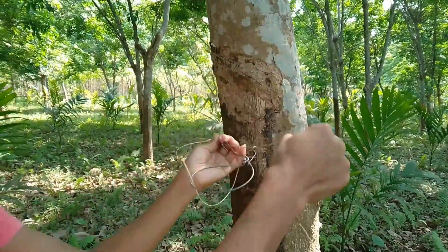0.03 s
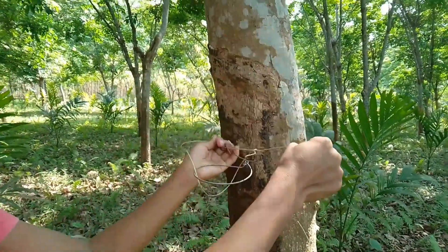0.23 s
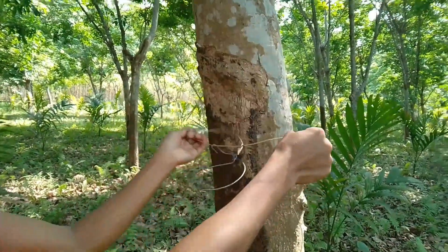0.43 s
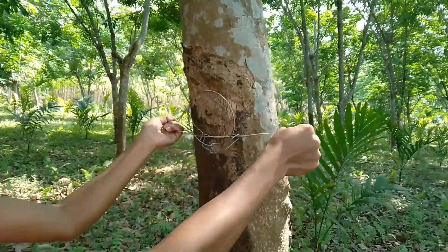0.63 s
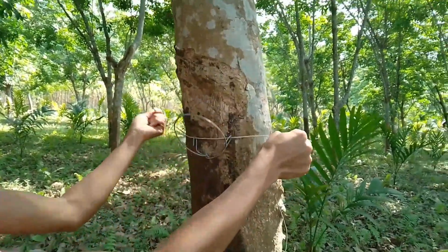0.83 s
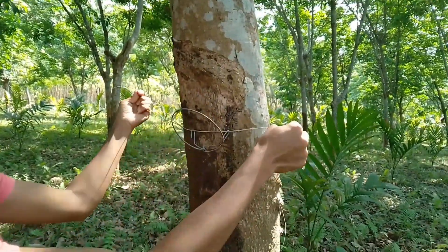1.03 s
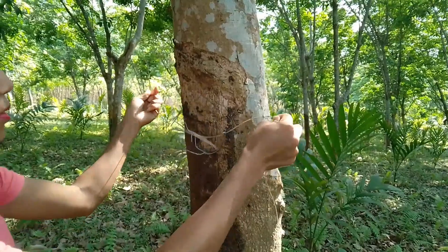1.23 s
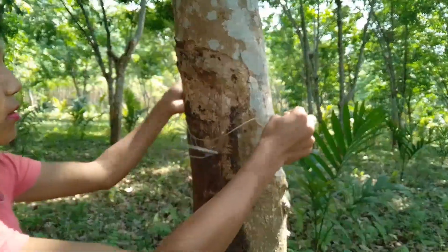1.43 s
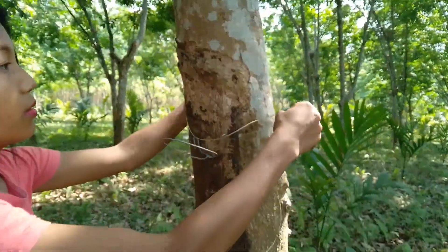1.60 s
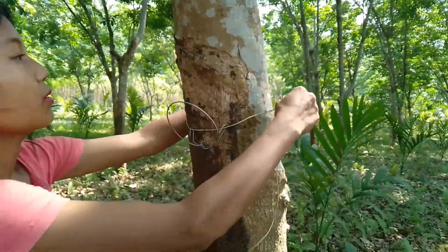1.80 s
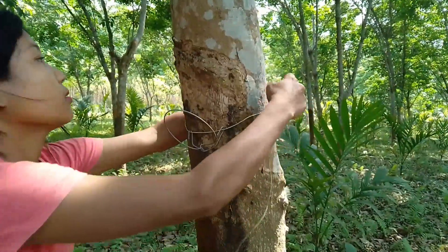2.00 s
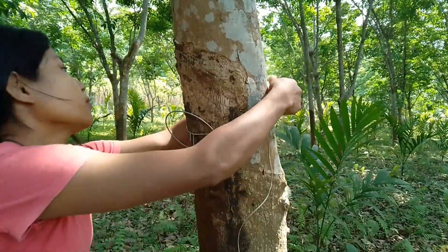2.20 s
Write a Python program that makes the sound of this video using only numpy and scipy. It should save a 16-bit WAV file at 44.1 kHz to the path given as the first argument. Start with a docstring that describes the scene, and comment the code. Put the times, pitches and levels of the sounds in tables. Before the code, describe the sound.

Close by, a thin cord scrapes across tree bark with a high rasp and dry ticks. It slows, gives a brief tug, then rubs softly as it is adjusted. The outdoor background holds only a faint, high hiss.

```python
"""One long, rasping pull as a thin, stiff strand is drawn round a tree trunk outdoors.
A short tug follows, then light rubbing as the strand is adjusted. The rasp is thousands of tiny slips
over the bark, which also set the strand ringing. Bigger snags let go as dry ticks, and quick sticking
and slipping makes brief squeaks. Ground and leaves add a short echo; a faint high hiss lies behind."""
import sys
import numpy as np
from scipy import signal
from scipy.fft import rfft, irfft, next_fast_len
from scipy.io import wavfile
from scipy.ndimage import uniform_filter1d

SR = 44100
rng = np.random.default_rng(int(sys.argv[2]) if len(sys.argv) > 2 else 0)


def digitize_waveform(pressure):
    """Quantize a signal to 16-bit integers and store it at the path in sys.argv[1].

    Rows of a 2-D input are taken as channels; values are limited to [-1, 1].
    """
    field = np.atleast_2d(pressure).T
    bounded = np.clip(field, -1, 1)
    quanta = np.round(bounded * 32767).astype(np.int16)
    wavfile.write(sys.argv[1], SR, quanta)


N = 103635
T = np.arange(N) / SR
RELEASE_S = 0.025   # fade at the end of the pull and of the tug

# How hard the strand rubs in the pull and in the tug: time_s, level_db
PULL_LEVELS = [(0, -66.5), (.125, -65.5), (.2, -54.5), (.25, -43), (.3, -37.5), (.39, -33.5), (.44, -35.5),
               (.5, -36.5), (.56, -36.5), (.65, -41.5), (.69, -45), (.76, -50.5), (.845, -53.5)]
TUG_LEVELS = [(.851, -57), (.864, -43), (.875, -44), (.893, -51.5), (.915, -52), (.965, -53.5), (1.03, -63),
              (1.15, -78.5), (1.25, -67.5)]
# The pitches at which the free strand rings: pitch_hz, width_hz, level_db
STRAND_RINGS = [(2186, 160, -11), (2850, 67, -9), (4160, 410, -20.5), (4980, 83, -9), (6770, 220, -20),
                (9600, 87, -19.5), (10640, 280, -19), (12000, 130, -9.5), (12300, 120, -3.5),
                (13900, 300, -8.5)]


def long_pull():
    """The strand rasps round the trunk, taut at first, then crackling and ringing as it slows."""
    # How fast the strand moves: time_s, share_of_full_speed
    pull_speed = [(.5, 1), (.72, .2)]
    # Tone of the taut strand rubbing: pitch_hz, level_db
    taut_tone = [(300, -42.5), (1000, -25), (1600, -12.5), (2100, -2), (2550, -2), (3400, -7), (6300, -6),
                 (7700, -14), (9000, -10.5), (10500, -5.5), (11700, 2), (12600, 2.5), (13400, -5.5),
                 (14400, -20.5), (15600, -9.5)]
    # Treble compared with the rest of the rasp: time_s, level_db
    brightness = [(.15, 1.5), (.24, -2), (.34, -2.5), (.45, 1.5), (.58, -2.5), (.68, -0.5), (.8, -2)]
    speed = np.interp(T, *np.transpose(pull_speed))
    slips_per_s, catch_db = 9000 * speed, 0.5
    run = slips(slips_per_s, catch_db + 3 * (1 - speed))   # a slower strand catches more
    run = run + from_db(-5) * pings()
    rasp = rms_one(coloured(run, taut_tone))
    # One high band stays weak early on, so the pull starts hollow.
    band = signal.sosfiltfilt(signal.butter(2, [7000, 8900], "band", fs=SR, output="sos"), rasp)
    rasp = rasp - 0.6 * np.clip((0.373 - T) / 0.042, 0, 1) * band
    # As the strand slackens, up to half the power goes into ringing.
    ring_share = np.clip((T - 0.69) / 0.18, 0, 1) / 2
    ring = rms_one(ringing(run, STRAND_RINGS))
    rasp = np.sqrt(1 - ring_share) * rasp + np.sqrt(ring_share) * ring
    treble = signal.sosfiltfilt(signal.butter(2, 4700, "high", fs=SR, output="sos"), rasp)
    tilt = np.sqrt(level(brightness))
    ridges = rms_one(from_db(1.2 * drift(rate_hz=150)))   # bark ridges roughen the middle pitches
    rasp = treble * tilt + ridges * (rasp - treble) / tilt
    fade_out = np.clip((TUG_LEVELS[0][0] - T) / RELEASE_S, 0, 1)
    return fade_out * (level(PULL_LEVELS) + scuffs()) * rasp + bark_rasp(slips_per_s, catch_db)


def bark_rasp(slips_per_s, catch_db):
    """The bark answers with a lower rasp as the strand presses into it."""
    # Loudness of the low rasp: time_s, level_db
    bark_levels = [(0, -95), (.18, -75), (.3, -60), (.42, -50), (.57, -55.5), (.68, -64.5), (.8, -71.5),
                   (.87, -78), (.96, -70.5), (1.05, -104)]
    # Tone of the bark: pitch_hz, level_db
    bark_tone = [(150, -32.5), (270, -15), (440, -4), (590, -7), (780, 2), (920, -8.5), (1200, 5),
                 (1700, 6.5), (2600, -8.5), (5000, -23.5)]
    return level(bark_levels) * rms_one(coloured(slips(slips_per_s, catch_db), bark_tone))


def light_rubbing():
    """Fewer slips on a slack strand: a tug that sets it ringing, then small adjustments."""
    # Tone of the slack strand rubbing: pitch_hz, level_db
    slack_tone = [(300, -27), (1400, -12.5), (2100, -2), (2950, -3), (3700, -7), (5300, -6), (7000, -12.5),
                  (8600, -12), (10300, -7), (11500, -8), (12500, -1), (13500, -0.5), (14400, -21.5),
                  (15600, -24.5)]
    # How hard the strand rubs while it is adjusted: time_s, level_db
    adjust_levels = [(1.66, -72.5), (1.7, -66.5), (1.865, -75.5), (1.882, -59.5), (1.912, -62.5),
                     (1.96, -65.5), (2.1, -62.5), (2.13, -57.5), (2.18, -63.5), (2.21, -53), (2.255, -57.5),
                     (2.35, -52.5)]
    # The pitches at which the shortened strand rings: pitch_hz, width_hz, level_db
    short_rings = [(2950, 220, -17.5), (10870, 120, -6), (11980, 190, -4.5), (12800, 170, -10),
                   (12900, 200, -15.5)]
    run = slips(per_s=4500, catch_db=6.5) + from_db(-3) * pings()
    rub = rms_one(coloured(run, slack_tone))
    surges = scuffs()
    fade_in = np.clip((T - PULL_LEVELS[-1][0]) / 0.006 + 1, 0, 1)
    fade_out = np.clip((TUG_LEVELS[-1][0] - T) / RELEASE_S, 0, 1)
    tug_gain = fade_in * fade_out * (level(TUG_LEVELS) + surges)
    tug = from_db(-2) * rub + ringing(rub, STRAND_RINGS)
    adjust_gain = (T > adjust_levels[0][0]) * (level(adjust_levels) + surges)
    adjusting = from_db(-2.5) * rub + ringing(rub, short_rings)
    return tug_gain * tug + adjust_gain * adjusting


def slips(per_s, catch_db, spread_db=3.5, even_s=0.023):
    """Tiny slips of random size, bunched as the strand catches and comes free."""
    sizes = from_db(spread_db * np.minimum(rng.exponential(1, N), 4)) * rng.choice([-1, 1], N)
    slipping = rng.random(N) < per_s / SR
    grip = from_db(catch_db * drift(rate_hz=48))
    run = rms_one(sizes * slipping * grip)
    # Even out chance swings in loudness so the rasp stays steady.
    return run / np.sqrt(uniform_filter1d(run ** 2, int(even_s * SR)) + 1e-6)


def pings(count=48, per_s=1600, spread_db=2.2, low_hz=1678, high_hz=13987):
    """Some slips pluck the strand, which pings at a pitch set by where it caught."""
    sizes = from_db(spread_db * np.minimum(rng.exponential(1, N), 3)) * rng.choice([-1, 1], N)
    plucks = sizes * (rng.random(N) < per_s / SR)
    spot = rng.integers(0, count, N)
    pitches = low_hz + (high_hz - low_hz) * (np.arange(count) + rng.random(count)) / count
    return rms_one(sum(resonance(plucks * (spot == k), hz, width_hz=100) for k, hz in enumerate(pitches)))


def ringing(run, rings):
    """The slips set the strand ringing at its own pitches."""
    return sum(from_db(db) * resonance(run, hz, width_hz) * (-1) ** k
               for k, (hz, width_hz, db) in enumerate(rings))


def scuffs(rise_s=0.0008):
    """Extra gain for the rubbing: brief, soft surges as the strand drags over rough spots."""
    # One surge per row: start_s, decay_s, level_db
    rough_spots = [(0.141, 0.0028, -47), (0.173, .008, -46), (.214, 0.0033, -45), (0.611, 0.0057, -44),
                   (0.746, 0.0014, -51), (0.855, 0.0045, -54), (0.974, 0.0043, -53), (1.075, 0.0044, -53.5),
                   (1.885, 0.0032, -54), (1.904, 0.0033, -65), (2.19, 0.0032, -48)]
    gain = 0
    for start_s, decay_s, db in rough_spots:
        age = np.maximum(T - start_s, 0)
        gain = gain + from_db(db) * (1 - np.exp(-age / rise_s)) * np.exp(-age / decay_s)
    return gain


def ticks(size=1024, rise_s=0.00012, hold_s=0.001, fall_s=0.00055, tail_s=0.003):
    """Each snag lets go in a tiny burst: a mix of woody knock, crack and bright snap."""
    # One snag per row: start_s, knock_db, crack_db, snap_db, knock_pitch_hz
    snags = [(0.0613, -71, -66, -46, 2920), (0.0786, -51.5, -57, -55, 2140),
             (0.3703, -32.5, -49, -28, 2700), (0.396, -45, -40, -31, 3100), (0.455, -45, -49, -30, 3230),
             (0.4574, -32, -34, -23, 3370), (0.5494, -31.5, -35, -29, 2260), (0.586, -41, -55, -31, 2620),
             (0.601, -37.5, -51, -34, 2350), (0.6243, -34, -50, -32, 2600), (0.642, -38.5, -51, -29, 2600),
             (0.6467, -32, -50, -27.5, 3070), (.653, -32, -35.5, -30.5, 2520), (0.695, -38, -47, -40, 2380),
             (.712, -41.5, -37.5, -27, 2800), (0.7318, -40, -50, -50, 2480), (0.7642, -44, -56, -43, 2670),
             (.8248, -49, -48, -37.5, 2800), (0.9239, -43.5, -40.5, -43, 3000),
             (0.9327, -54, -59, -35, 2660), (.945, -42, -47, -34.5, 3200), (.9545, -47, -61, -65, 2110),
             (1.077, -75, -52.5, -42, 2300), (1.1444, -62, -56, -49, 3070), (1.306, -63, -71, -49.5, 2290),
             (1.423, -59.5, -67, -52.5, 2680), (1.454, -48.5, -70, -33, 2520),
             (1.7293, -39.5, -50, -45, 3040), (1.855, -60, -62, -48, 2190), (1.8755, -62, -53, -53, 3030),
             (2.011, -47, -74, -55, 2850), (2.1118, -49.5, -60, -46, 3250), (2.2143, -45.5, -53, -59, 3400),
             (2.2728, -43, -43, -39.5, 3430), (2.3377, -44.5, -65, -52, 2950)]
    # Tones of the three parts: pitch_hz, level_db
    knock_tone = [(200, -45), (800, -23.5), (1150, -17), (1800, -15), (2600, -1), (3150, -1), (4000, -8),
                  (9000, -34)]
    crack_tone = [(1500, -59), (3800, -7.5), (5400, 5), (7000, 5.5), (8500, -26), (13000, -52)]
    snap_tone = [(4000, -39), (7500, -18), (9200, -4), (10200, -3.5), (11400, 8), (13400, 3.5),
                 (14300, -11.5), (16000, -19)]
    knock_centre_hz = 2786   # the knock's tone is moved from here to each snag's own pitch
    t, out = T[:size], np.zeros(N + size)
    shape = np.exp(-np.maximum(t - hold_s, 0) / fall_s) + from_db(-14) * np.exp(-t / tail_s)
    shape = shape * (1 - np.exp(-t / rise_s))
    gain = from_db(-4) * np.sqrt(0.002 * SR / size)   # as if the energy fell within 2 ms
    for start_s, *levels_db, knock_hz in snags:
        start = int(start_s * SR)
        tuned_knock = [(hz * knock_hz / knock_centre_hz, db) for hz, db in knock_tone]
        for db, tone in zip(levels_db, (tuned_knock, crack_tone, snap_tone)):
            burst = evened(shape * rng.choice([-1, 1], size))
            out[start:start + size] += gain * from_db(db) * rms_one(coloured(burst, tone))
    return out[:N]


def snap_rings(rise_s=0.0003, fall_s=0.0011):
    """Two loud, lone snaps ring for a few milliseconds at pitches of their own."""
    # One snap per row: start_s, list of (pitch_hz, level_db)
    lone_snaps = [(1.454, [(750, -58), (2900, -47), (5650, -45), (7600, -43), (9200, -41)]),
                  (1.7293, [(2500, -43.5), (3500, -44), (5200, -47)])]
    out = 0
    for start_s, rings in lone_snaps:
        age = np.maximum(T - start_s, 0)
        shape = (1 - np.exp(-age / rise_s)) * np.exp(-age / fall_s)
        for hz, db in rings:
            out = out + from_db(db) * np.cos(2 * np.pi * hz * age) * shape
    return out


def squeaks():
    """The strand sticks and slips fast enough to give a brief pitch."""
    # One squeak per row: middle_s, half_length_s, pitch_hz, width_hz, level_db
    sticky_spots = [(0.26, 0.057, 1850, 110, -57), (.26, 0.036, 15000, 570, -57),
                    (1.106, 0.034, 2220, 75, -70.5), (1.909, .011, 5480, 90, -65),
                    (2.278, 0.057, 2950, 150, -64.5)]
    out = 0
    for middle_s, half_length_s, hz, width_hz, db in sticky_spots:
        swell = np.exp(-((T - middle_s) / half_length_s) ** 2)
        out = out + from_db(db) * swell * resonance(rng.standard_normal(N), hz, width_hz)
    return out


def outdoor_echo(sound, delay_s=0.004, fade_s=0.21):
    """Ground and leaves scatter back a thin, short wash of echoes."""
    t = T[:SR // 2]
    echoes = rng.standard_normal(len(t)) * from_db(-60 * t / fade_s) * (t > delay_s)
    return from_db(-16) * signal.fftconvolve(sound, echoes / np.linalg.norm(echoes))[:N]


def background_hiss():
    """A faint, steady, high hiss."""
    # Tone of the hiss: pitch_hz, level_db
    hiss_tone = [(20, 15.5), (48, 0), (100, -3.5), (155, -28.5), (220, -6.5), (320, 1.5), (500, -3),
                 (1300, -4.5), (2400, -0.5), (3600, -5.5), (6300, -3), (7000, 4.5), (7400, 9), (7900, 8),
                 (8400, -1.5), (9700, 1), (11200, 2.5), (13000, 0), (14300, -11.5), (15600, -9)]
    return from_db(-66.5) * rms_one(coloured(rng.standard_normal(N), hiss_tone))


def from_db(db):
    """Turn decibels into a gain to multiply by."""
    return 10 ** (np.asarray(db) / 20)


def rms_one(x):
    """Scale a signal so its average strength (rms) is 1."""
    return x / np.sqrt(np.mean(x ** 2) + 1e-20)


def level(rows):
    """Gain over time from rows of time_s, level_db."""
    return from_db(np.interp(T, *np.transpose(rows)))


def coloured(x, tone):
    """Filter a sound by rows of pitch_hz, level_db."""
    size = 2 * next_fast_len(len(x))
    hz, db = np.transpose(tone)
    gain = from_db(np.interp(np.log(np.fft.rfftfreq(size, 1 / SR) + 1), np.log(hz), db))
    # Fold the filter (minimum phase) so it never rings ahead of a click.
    cepstrum = irfft(np.log(gain))
    cepstrum[1:size // 2] *= 2
    cepstrum[size // 2 + 1:] = 0
    return irfft(rfft(x, size) * np.exp(rfft(cepstrum)))[:len(x)]


def resonance(x, hz, width_hz):
    """Make a sound ring at one pitch; a smaller width rings longer."""
    decay = np.exp(-np.pi * width_hz / SR)
    feedback = [1, -2 * decay * np.cos(2 * np.pi * hz / SR), decay * decay]
    return rms_one(signal.lfilter([1, 0, -1], feedback, x + 1e-18))


def drift(rate_hz):
    """A smooth random wander with a typical size of 1."""
    decay = np.exp(-2 * np.pi * rate_hz / SR)
    return rms_one(signal.lfilter([1], [1, -2 * decay, decay * decay], rng.standard_normal(N + SR))[SR:])


def evened(burst):
    """Halve the chance peaks and dips (in dB) in a short burst's tone."""
    spectrum = rfft(burst, 2 * len(burst))
    return irfft(spectrum / np.sqrt(np.abs(spectrum) + 1e-9))[:len(burst)]


def scene():
    """The strand on the bark, its echo and the hiss, in one channel."""
    strand = long_pull() + light_rubbing() + ticks() + snap_rings() + squeaks()
    hiss = background_hiss()
    return (strand + outdoor_echo(strand) + hiss)[None]


def record(dry):
    """Cut away the very highest treble steeply."""
    cutoff_hz = 15400
    return signal.sosfilt(signal.ellip(10, .1, 70, cutoff_hz, fs=SR, output="sos"), dry)


dry = scene()
out = record(dry)
digitize_waveform(out)
```